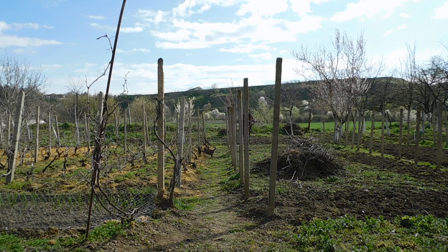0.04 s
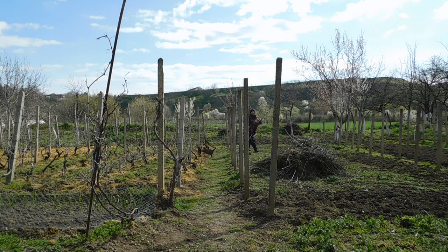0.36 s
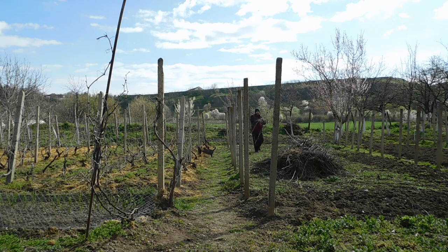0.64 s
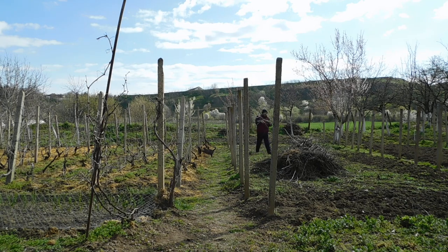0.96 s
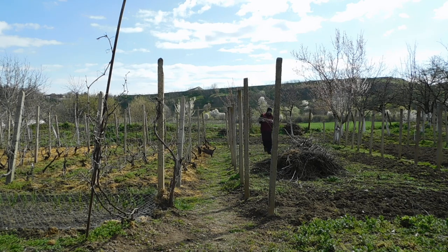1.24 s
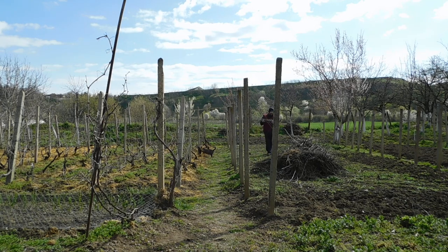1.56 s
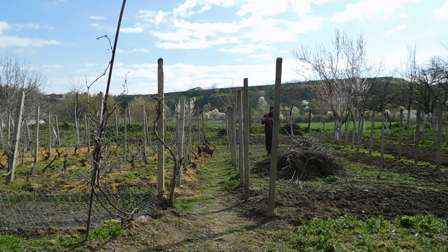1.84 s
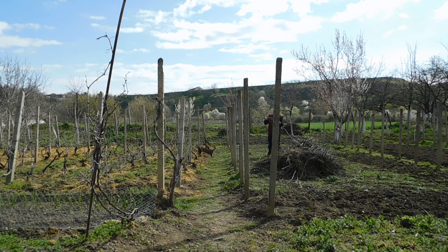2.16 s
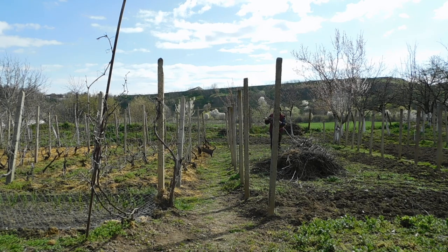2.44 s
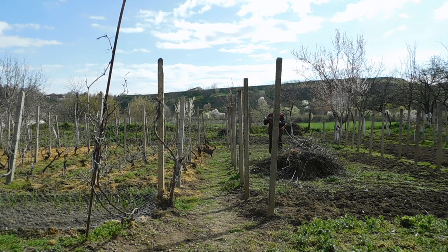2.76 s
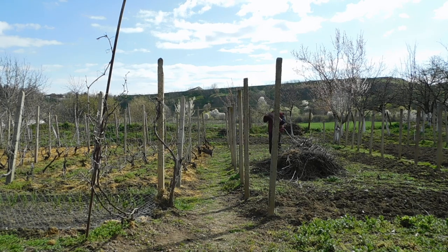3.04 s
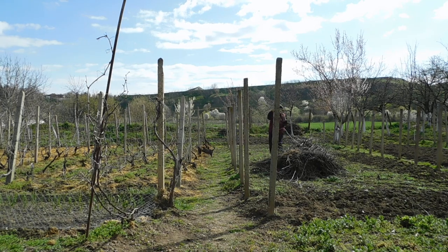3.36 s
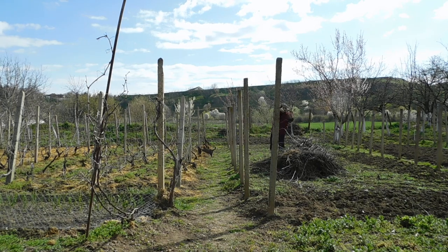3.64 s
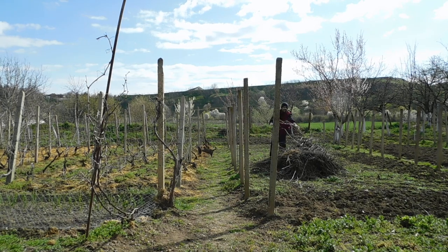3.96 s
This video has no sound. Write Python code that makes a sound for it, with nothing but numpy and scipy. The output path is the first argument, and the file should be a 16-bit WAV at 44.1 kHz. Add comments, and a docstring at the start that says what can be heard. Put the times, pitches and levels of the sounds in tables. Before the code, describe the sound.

Dry branches scrape and crackle onto a brush pile while gusts buffet the microphone.

```python
"""Cut branches are dragged over the ground and shoved onto a brush pile, some way off in an open vineyard.
Each tug sets off a dense crackle of twigs over a woody scrape; a few twigs snap.
Gusts shed eddies that thump on the left and right microphone ports in turn,
over a low breeze rumble and a faint outdoor hush. The treble fizzes briefly a few times."""
import sys
import numpy as np
from scipy import signal
from scipy.fft import rfft, irfft
from scipy.io import wavfile

SR = 44100
rng = np.random.default_rng(int(sys.argv[2]) if len(sys.argv) > 2 else 0)


def store_wav(level_fs):
    """Save 16-bit WAV to argv[1]."""
    pcm = np.round(np.clip(np.atleast_2d(level_fs), -1, 1) * 32767)
    wavfile.write(sys.argv[1], SR, pcm.T.astype(np.int16))


N = 176400
TIME = np.arange(N) / SR
BINS_HZ = np.fft.rfftfreq(N, 1 / SR)


def amp(db):
    """Decibels to gain."""
    return 10 ** (np.asarray(db) / 20)


def unit(x):
    """Scales to rms 1."""
    return x / np.sqrt(np.mean(x ** 2) + 1e-20)


def spectrum(points):
    """Interpolates a table over log frequency at every bin."""
    hz, value = np.transpose(points)
    return np.interp(np.log(BINS_HZ + 1), np.log(hz), value)


def colour(x, points):
    """Filters by a spectrum table; unity power gain for white noise."""
    return irfft(rfft(x) * unit(amp(spectrum(points))), N)


def band(x, hz, octaves):
    """Bell-shaped bandpass; unity power gain for white noise."""
    bell = np.exp(-.5 * (np.log2((BINS_HZ + 1) / hz) / octaves) ** 2)
    return irfft(rfft(x) * unit(bell), N)


def wander(hz):
    """Lowpassed noise, rms 1."""
    return unit(irfft(rfft(rng.standard_normal(N)) / (1 + (BINS_HZ / hz) ** 4), N))


def add(mix, start_s, sound):
    """Mixes a sound in at start_s."""
    part = mix[..., max(round(start_s * SR), 0):][..., :sound.shape[-1]]
    part += sound[..., :part.shape[-1]]


def clicks(per_s, spread_db):
    """Three trains of tiny clicks, mostly weak, a few strong."""
    size = amp(spread_db * np.minimum(rng.exponential(1, (3, N)), 5))
    polarity = rng.choice([-1, 1], (3, N))
    return unit(size * polarity * (rng.random((3, N)) < per_s / SR))


# Rustle common to both ports: freq_hz, power_fraction
RUSTLE_COHERENCE = [(1300, 0.92), (2500, 0.8), (15000, 0.37)]
# Port balance: freq_hz, left_minus_right_db
PORT_BALANCE = [(700, 1.5), (1300, -5), (2150, 4.5), (2600, -6), (3500, 0), (4800, -3), (15000, 0.5)]
def at_ports(three, coherence, left_lag_s=0.00013):
    """Row 0 arrives direct, right port first; rows 1 and 2 are scattered sound, one per port."""
    shared, spectra = np.clip(coherence, 0, 1), rfft(three)
    pair = np.sqrt(shared) * spectra[0] + np.sqrt(1 - shared) * spectra[1:]
    pair[0] *= np.exp(-2j * np.pi * BINS_HZ * left_lag_s)
    return irfft(pair * amp(np.outer([.5, -.5], spectrum(PORT_BALANCE))), N)


# Tugs on the branches: start_s, rise_s, hold_s, level_db
BRANCH_TUGS = [(0.0, 0.041, 0.046, -59), (0.1, 0.024, 0.12, -64.5), (0.298, 0.0083, 0.0068, -63),
               (0.415, 0.011, 0.083, -61.5), (0.485, 0.084, 0.031, -56), (0.648, .012, 0.19, -54.5),
               (0.87, 0.011, 0.011, -50.5), (0.936, 0.039, 0.052, -50.5), (1.119, 0.047, 0.073, -50.5),
               (1.246, 0.062, 0.089, -46.5), (1.396, 0.024, 0.098, -50.5), (1.517, 0.013, 0.017, -43.5),
               (1.609, 0.056, 0.071, -48), (1.818, 0.045, 0.018, -53), (1.875, 0.061, 0.067, -55),
               (2.154, 0.034, 0.076, -49.5), (2.419, .03, 0.024, -53.5), (2.48, 0.065, 0.053, -51.5),
               (2.663, 0.083, 0.065, -51), (2.812, 0.098, 0.21, -61), (3.571, 0.028, 0.025, -64),
               (3.91, 0.018, .09, -66.5)]
# Twigs trailing between tugs: time_s, level_db
TWIG_TRAIL = [(.38, -76), (.7, -61.5), (1.4, -56.5), (1.8, -62), (2.85, -61), (3.12, -69), (3.25, -90)]
def drag_level_db(fade_db_per_s=262):
    """Each tug swells, holds and dies away over the steady trailing."""
    power = amp(np.interp(TIME, *np.transpose(TWIG_TRAIL))) ** 2
    for start_s, rise_s, hold_s, level_db in BRANCH_TUGS:
        t = TIME - start_s
        attack = np.clip(t / rise_s, 0, 1)
        fade_db = fade_db_per_s * np.maximum(t - rise_s - hold_s, 0)
        power += (attack * amp(level_db - fade_db)) ** 2
    return 10 * np.log10(power)


CRACKS_PER_S, CRACK_SPREAD_DB = 5000, 3.5
# Twig crackle: freq_hz, gain_db
CRACKLE_SPECTRUM = [(300, -76), (1500, -0.5), (4100, 3.5), (6800, -1.5), (8900, -4.5), (9900, -7),
                    (14000, -11), (16000, -18)]
# Woody scrape: freq_hz, gain_db
SCRAPE_SPECTRUM = [(100, -45), (600, -6.5), (950, -4.5), (1450, 2.5), (2100, -5), (3100, -9.5), (5000, -13),
                   (12000, -35.5)]
def branches(crackle_gain_db=4.5, scrape_gain_db=6, scrape_follow=0.78, pivot_db=-45):
    """Thin twigs crackle in clumps while the thicker wood scrapes along."""
    drag_db = drag_level_db()
    clump_db = wander(hz=89)
    cracks = clicks(CRACKS_PER_S, CRACK_SPREAD_DB) * amp(crackle_gain_db + drag_db + clump_db)
    scrape_db = scrape_gain_db + pivot_db + scrape_follow * (drag_db - pivot_db)
    rubs = clicks(per_s=5000, spread_db=2) * amp(scrape_db + clump_db)
    rustle = colour(cracks, CRACKLE_SPECTRUM) + colour(rubs, SCRAPE_SPECTRUM)
    return at_ports(rustle, spectrum(RUSTLE_COHERENCE))


# Distant outdoor background: freq_hz, gain_db
AIR_SPECTRUM = [(200, -12.5), (620, -2), (1400, -2.5), (2200, -7), (3500, -14.5), (15000, -31)]
def air(level_db=-54, coherent_below_hz=2500):
    """Smooth hush of open country, alike at both ports only below the treble."""
    hush = colour(rng.standard_normal((3, N)), AIR_SPECTRUM)
    coherence = 0.94 / (1 + (BINS_HZ / coherent_below_hz) ** 2)
    return amp(level_db) * at_ports(hush, coherence)


# Breeze strength: time_s, level_db
BREEZE_LEVELS = [(1.12, -65), (1.45, -45), (2.05, -46.5), (2.25, -56.5), (3.15, -50), (3.35, -56),
                 (3.65, -55), (3.85, -70)]
# Breeze rumble: freq_hz, gain_db
RUMBLE_SPECTRUM = [(20, 0.5), (150, -5), (300, -14.5), (600, -26), (2000, -51)]
def breeze(lump_db=5.5, lump_hz=24.8):
    """Lumpy low rumble, independent at each port."""
    lumps = np.array([amp(lump_db * wander(lump_hz)) for _ in range(2)])
    rumble = unit(colour(lumps * rng.standard_normal((2, N)), RUMBLE_SPECTRUM))
    return rumble * amp(np.interp(TIME, *np.transpose(BREEZE_LEVELS)))


def port_gains(port, leak_db=-24):
    """Wind on one port barely reaches the other."""
    return amp([[0], [leak_db]] if port == "left" else [[leak_db], [0]])


def eddy(hz, cycles):
    """A swirl passing a port: a pressure dip balanced by two smaller crests, centred in 0.1 s."""
    turns = hz * (TIME[:SR // 10] - 1 / 20)
    window = 1 / np.cosh(np.minimum(abs(2 * turns / cycles), 20))
    wave = -np.cos(2 * np.pi * turns)
    return window * (wave - np.average(wave, weights=window))


# Hardest eddies: centre_s, level_db, pitch_hz, half_length_cycles, port
PORT_BUFFETS = [(0.216, -38, 145, 0.55, "right"), (1.369, -20.5, 334, 0.39, "right"),
                (1.4184, -10, 480, 0.36, "left"), (1.4244, -13, 370, 1.34, "left"),
                (1.443, -14, 363, 1.2, "left"), (1.459, -16, 540, 0.54, "left"),
                (1.4644, -13.5, 540, 1.1, "left"), (1.587, -14.5, 224, 0.59, "left"),
                (1.666, -23, 298, 0.6, "left"), (1.812, -25, 252, 0.39, "left"),
                (1.9945, -26, 400, 0.67, "right"), (2.0702, -26.5, 414, 0.62, "left"),
                (2.3492, -25, 220, 0.44, "left"), (2.8398, -28, 198, 0.84, "left"),
                (2.966, -26.5, 314, 0.54, "right"), (2.986, -20.5, 270, 0.54, "right"),
                (3.1073, -4.5, 520, 0.47, "right"), (3.1222, -7.5, 487, 0.38, "right"),
                (3.131, -11.5, 450, 0.37, "right"), (3.1462, -6.5, 527, 0.92, "right"),
                (3.1683, -14.5, 360, 0.8, "right"), (3.2314, -24, 396, 0.63, "right")]
def buffets():
    """Single hard eddies thump on one port."""
    out = np.zeros((2, N))
    for centre_s, level_db, pitch_hz, cycles, port in PORT_BUFFETS:
        add(out, centre_s - 1 / 20, amp(level_db) * port_gains(port) * eddy(pitch_hz, cycles))
    return out


# Breaking twigs, thinner ones higher: start_s, level_db, centre_hz
TWIG_SNAPS = [(0.676, -28.5, 2190), (1.531, -25.5, 6000), (1.852, -36.5, 7000), (2.615, -31.5, 5000),
              (3.211, -48, 10000), (3.286, -49, 13000), (3.469, -41, 5200), (3.681, -40.5, 4800),
              (3.9, -45, 9500)]
def snaps(decay_s=0.0013, shiver_peak_s=0.0055, shiver_db=-13.5):
    """A twig breaks with a sharp crack; its neighbours shiver just after."""
    out, t = np.zeros((3, N)), TIME[:SR // 10]
    shiver = amp(shiver_db) * t / shiver_peak_s * np.exp(1 - t / shiver_peak_s)
    envelope = np.exp(-t / decay_s) + shiver
    for start_s, level_db, centre_hz in TWIG_SNAPS:
        crack = np.zeros_like(out)
        add(crack, start_s, .5 * amp(level_db) * envelope * rng.standard_normal((3, len(t))))
        out += band(crack, centre_hz, octaves=1.1)
    return at_ports(out, spectrum(RUSTLE_COHERENCE))


EDDIES_PER_S, EDDY_SPREAD_DB, EDDY_SPREAD_OCTAVES = 900, 2.5, 0.7
EDDY_REF_HZ, EDDY_REF_DB, DB_PER_OCTAVE = 242.5, -35, 18.5
# Gusts on the ports: centre_s, half_length_s, level_db, port
PORT_GUSTS = [(.72, 0.058, -49, "left"), (1.166, 0.034, -46.5, "right"), (1.361, 0.046, -39.5, "right"),
              (1.45, 0.036, -25.5, "left"), (1.509, 0.039, -27.5, "left"), (1.604, 0.033, -27.5, "left"),
              (1.928, 0.033, -35.5, "left"), (2.008, .014, -34.5, "right"), (2.05, 0.015, -39.5, "left"),
              (2.412, 0.023, -38.5, "left"), (2.472, 0.014, -30.5, "left"), (2.514, 0.014, -33.5, "left"),
              (2.791, 0.1, -45.5, "left"), (3.071, 0.075, -39, "right"), (3.131, 0.025, -23, "right"),
              (3.186, 0.05, -35, "right"), (3.61, 0.026, -44, "right")]
def gusts(pitch_count=16):
    """Each gust sheds a random run of eddies; stronger gusts shed faster, higher ones."""
    out, t = np.zeros((2, N)), np.arange(-SR // 4, SR // 4) / SR
    for centre_s, half_s, level_db, port in PORT_GUSTS:
        swell = np.exp(-.5 * (t / half_s) ** 2 * (1 + (t / half_s) ** 2 / 2))
        centre_octaves = (level_db - EDDY_REF_DB) / DB_PER_OCTAVE
        run = np.zeros((2, len(t)))
        for deviation in np.linspace(-2, 2, pitch_count):
            hz = EDDY_REF_HZ * 2 ** (centre_octaves + EDDY_SPREAD_OCTAVES * deviation)
            hits = rng.random(run.shape) < EDDIES_PER_S / pitch_count / SR
            sizes = amp(EDDY_SPREAD_DB * rng.standard_normal(run.shape))
            eddies = signal.fftconvolve(hits * sizes, eddy(hz, cycles=0.77)[None], "same", axes=1)
            run += np.exp(-deviation ** 2 / 2) * eddies
        run = (run - run.mean(1, keepdims=True)) * swell
        run *= np.sqrt(np.sum(swell ** 2) / (np.sum(run ** 2, 1, keepdims=True) + 1e-12))
        add(out, centre_s - 1 / 5, amp(level_db) * port_gains(port) * run[:, SR // 20:])
    return out


def wind(flutter_db=-17):
    """Gusts and buffets, roughened by fine turbulence that follows their pressure."""
    pressure = gusts() + buffets()
    flutter = band(pressure * rng.standard_normal((2, N)), hz=827, octaves=0.39)
    return pressure + amp(flutter_db) * flutter


# Bursts of treble crackle: centre_s, half_length_s, level_db
TREBLE_FIZZES = [(1.538, .011, -48), (3.12, 0.032, -60), (3.48, 0.011, -58), (3.945, .025, -67)]
def fizzes():
    """Short, bright bursts of crackle near 10 kHz, one during the hardest wind thump."""
    swell = sum(amp(level_db) * np.exp(-.5 * ((TIME - centre_s) / half_s) ** 2)
                for centre_s, half_s, level_db in TREBLE_FIZZES)
    crackle = band(clicks(CRACKS_PER_S, CRACK_SPREAD_DB) * swell, hz=10200, octaves=0.51)
    return at_ports(crackle, spectrum(RUSTLE_COHERENCE))


def scene():
    """Branches, wind and background, in stereo."""
    return branches() + snaps() + fizzes() + wind() + breeze() + air()


def record(dry, cutoff_hz=15800):
    """Steep lowpass on the top treble."""
    lowpass = signal.firwin(511, cutoff_hz, window=("kaiser", 9), fs=SR)
    return signal.oaconvolve(dry, lowpass[None], "same")


dry = scene()
out = record(dry)
store_wav(out)
```